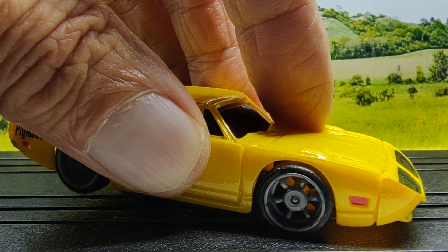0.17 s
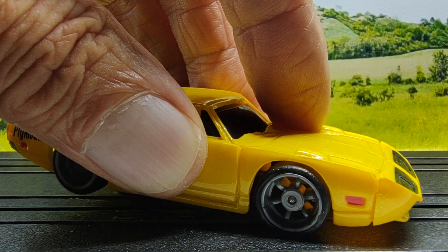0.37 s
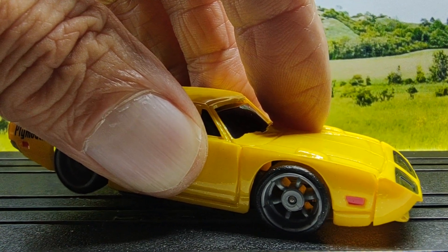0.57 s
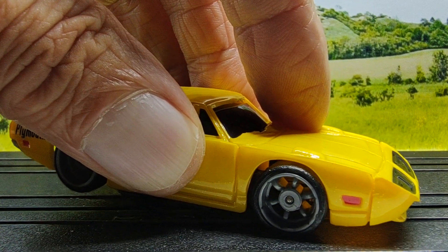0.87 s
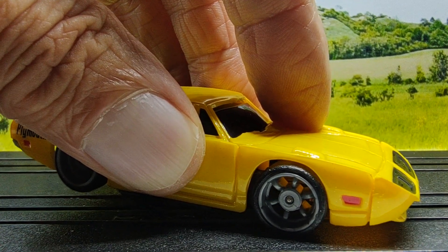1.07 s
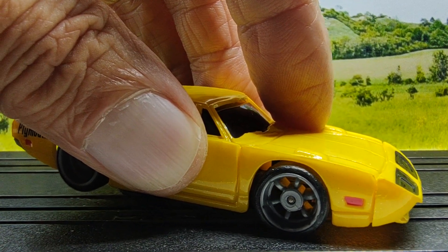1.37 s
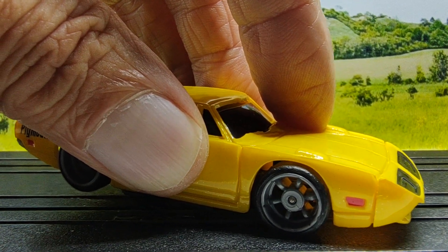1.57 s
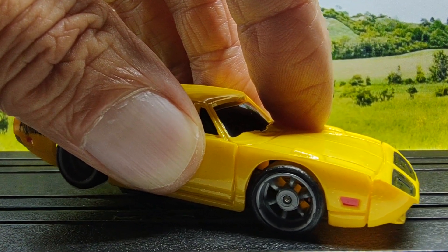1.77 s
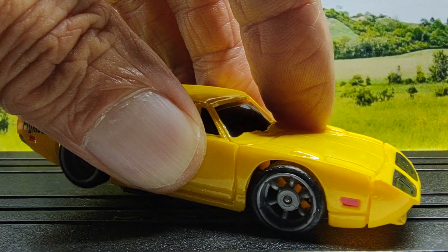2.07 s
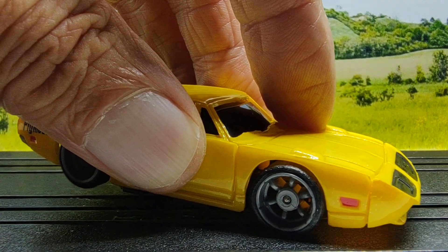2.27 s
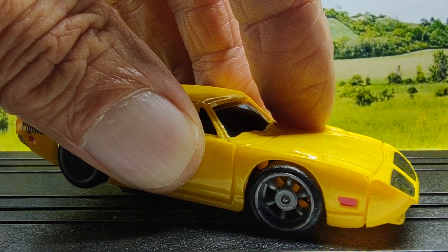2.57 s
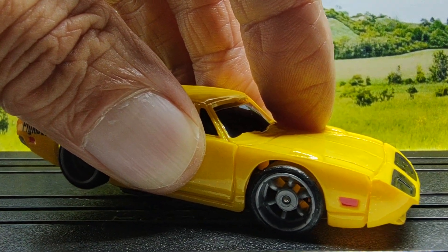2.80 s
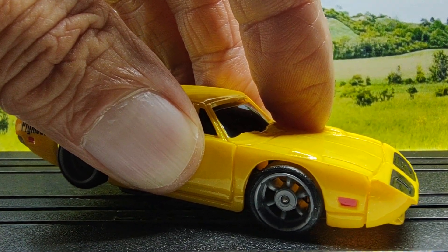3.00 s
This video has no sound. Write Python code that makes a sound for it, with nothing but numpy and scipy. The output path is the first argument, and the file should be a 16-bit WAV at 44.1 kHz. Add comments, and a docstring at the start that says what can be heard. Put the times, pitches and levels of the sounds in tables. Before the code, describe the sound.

A toy slot car's electric motor whirs continuously very close to a stereo microphone indoors: a piercing, many-toned whine with axle hum, rough beating and bright brush-and-gear hiss through a hollow plastic shell. Nearly steady at first, it bogs down from 0.4 s, reaches its lowest pitch around 0.65 s and recovers by 0.9 s. The whine then wavers slightly until about 3.1 s, still running.

```python
"""A toy slot car is held close to a stereo microphone indoors, its driven wheels spinning free.
The armature whines on multiples of its speed, the geared-down axle hums and beats against it, brushes and gears
hiss, all through the hollow shell. From 0.4 s the motor bogs down, is slowest near 0.65 s and recovers by 0.9 s;
the upper axle beat is strong early in the sag and again until 1.15 s. Then the whine wavers in pitch to the end."""
import sys
import numpy as np
from scipy import signal
from scipy.fft import rfft, irfft, next_fast_len
from scipy.io import wavfile
from scipy.ndimage import uniform_filter1d, map_coordinates

SR = 44100
rng = np.random.default_rng(int(sys.argv[2]) if len(sys.argv) > 2 else 0)


def generate_wav(signal):
    """Clip the signal to [-1, 1] and save it as 16-bit WAV at the path in sys.argv[1]."""
    frames = np.transpose(np.atleast_2d(signal))
    scaled = np.clip(frames, -1, 1) * 32767
    pcm = np.round(scaled).astype(np.int16)
    wavfile.write(sys.argv[1], SR, pcm)


N = 138474


def amp(db):
    """dB to gain."""
    return 10 ** (np.asarray(db) / 20)


def unit(x):
    """Scaled to rms 1."""
    return x / np.sqrt(np.mean(x ** 2) + 1e-20)


def along(rows, hz):
    """Each table column at hz, interpolated on a log frequency axis."""
    f, *cols = np.transpose(rows)
    return np.array([np.interp(np.log(hz + 1), np.log(f + 1), c) for c in cols])


def over_time(rows):
    """Each table column at every sample, interpolated linearly."""
    s, *cols = np.transpose(rows)
    return [np.interp(np.arange(N) / SR, s, c) for c in cols]


def wobble(rate_hz):
    """Smooth random curve through rate_hz normal random knots a second."""
    knots = rng.standard_normal(int(N * rate_hz / SR) + 4)
    return map_coordinates(knots, [np.arange(N) * rate_hz / SR])


def filtered(x, response):
    """x times a complex frequency response; the start is mirrored so that lagging parts begin full."""
    size, pad = next_fast_len(N + SR), SR // 10
    padded = np.concatenate([x[..., pad:0:-1], x], axis=-1)
    spectrum = rfft(padded, size) * response(np.fft.rfftfreq(size, 1 / SR))
    return irfft(spectrum, size)[..., pad:pad + N]


# phase by which left leads right: (frequency [Hz], lead [rad])
LEFT_LEAD = [(0, 0), (340, .4), (570, 3.6), (700, 6.3), (790, 9.3), (950, 12.6), (1640, 12.3), (2240, 16.4),
             (2370, 18.2), (3100, 24.3), (4220, 24.7), (4910, 31), (5340, 30.2), (6300, 34.3), (6800, 34.4),
             (7150, 36.9), (8530, 40.9), (8960, 44.5), (9730, 49.8), (10200, 51.4), (11100, 51.3),
             (11800, 53.2), (12600, 55.6), (14000, 63), (15800, 62.6)]


def path(rows):
    """Shell to both microphones: gain per side, the phase lead split evenly between them."""
    f, lead_rad = np.transpose(LEFT_LEAD)

    def response(hz):
        phase = np.exp(.5j * np.interp(hz, f, lead_rad) * [[1], [-1]])
        return amp(along(rows, hz)) * phase

    return response


PINION_TEETH, CROWN_TEETH = 7, 25
AXLE_RATIO = PINION_TEETH / CROWN_TEETH  # axle turns per armature turn

# relative hiss colour: (frequency [Hz], left density [dB per Hz], right density [dB per Hz])
HISS_PATH = [(30.2, -60, -66), (113, -39, -37), (160, -38, -41), (263, -31.5, -51.5), (320, -30.5, -24),
             (391, -28, -29), (407, -36, -28.5), (470, -37.5, -28.5), (555, -24, -42), (611, -34.5, -35),
             (672, -18, -18), (865, -22.5, -20.5), (925, -16, -20.5), (1022, -16, -22.5), (1094, -40, -27),
             (1106, -22.5, -24.5), (1270, -26, -19.5), (1395, -21, -26), (1395, -13, -30),
             (1447, -15.5, -34), (1525, -45, -27), (1576, -27, -18), (1643, -32, -29), (1763, -51, -23),
             (1920, -27.5, -26.5), (2120, -22, -25), (2320, -28.5, -23), (2420, -28.5, -16.5),
             (2670, -23, -21.5), (3090, -13.5, -13.5), (3370, -17.5, -27), (3560, -18.5, -15.5),
             (4200, -19.5, -19.5), (4950, -20, -19), (5460, -24.5, -25), (5370, -18.5, -10),
             (5940, -27, -34.5), (5984, -16, -16), (7570, -16.5, -8.5), (8246, -4, 0.5), (8920, -23, -5),
             (9060, -2.5, -7.5), (9900, -5.5, -7.5), (10250, -7.5, -19), (11300, -14.5, -15),
             (12300, -12, -15), (12400, -19.5, -17.5), (12740, -17.5, -22), (13000, -25, -25),
             (13650, -17, -19.5), (15000, -22.5, -25), (16300, -11.5, -13.5)]
# hiss power share common to both microphones: (frequency [Hz], share [0-1])
HISS_ALIKE = [(30, .9), (100, 0.95), (250, 0.6), (1000, 0.48), (2500, 0.45), (3100, 0.81), (3700, 0.01),
              (5500, 0.42), (6700, 0.71), (7400, 0.47), (9000, 0.8), (10400, 0), (11800, 0.46),
              (12500, 0.2), (15000, 0), (15700, 0.2)]
# hiss course before HISS_TRIM_DB: (time [s], level [dB])
HISS_LEVEL = [(0.0, -14), (0.02, -14), (0.55, -14), (0.71, -13), (0.85, -14), (2.7, -12.5), (3.14, -14.5)]
HISS_TRIM_DB = 2
PATCH_DB, SWELL_DB, RASP_DB = 0.97, 0.14, 0.5  # scatter: time-frequency patches, slow level, brush contact
TURN_DEPTH = 0.092  # fractional swell once an axle turn


def hiss(turns):
    """Brush and gear friction: patchy noise swelling once an axle turn, partly shared by both microphones."""
    spectra = signal.stft(rng.standard_normal((3, N)), nperseg=512)[2]
    # patches about 700 Hz by 60 ms
    patches = uniform_filter1d(rng.standard_normal(spectra.shape[1:]), 8, 0)
    patches = unit(uniform_filter1d(patches, 10, 1))
    noise = signal.istft(spectra * amp(PATCH_DB * patches), nperseg=512)[1][:, :N]
    axle_swell = 1 + TURN_DEPTH * np.sin(2 * np.pi * turns * AXLE_RATIO)
    noise = noise * axle_swell * amp(SWELL_DB * wobble(30.07) + RASP_DB * wobble(400))

    to_mics = path(HISS_PATH)
    share = lambda hz: np.clip(along(HISS_ALIKE, hz), 0, 1)
    common = filtered(noise[0], lambda hz: to_mics(hz) * np.sqrt(share(hz)))
    separate = filtered(noise[1:], lambda hz: to_mics(hz) * np.sqrt(1 - share(hz)))
    level_db, = over_time(HISS_LEVEL)
    return unit(common + separate) * amp(level_db + HISS_TRIM_DB)


# armature tones before the shell: (multiple of armature speed, level [dB])
WHINE = [(1, 0), (2, 1), (3, 1), (4, -1), (6, -2), (7, -2), (8, 1), (9, 0), (12, -8), (13, 1.2), (14, 3),
         (15, -6), (16, -12), (20, -1), (21, -3), (22, -4)]
# axle hum, lower beat, upper beat before the shell: (armature multiple, axle multiple, level [dB])
AXLE = [(0, 1, 0), (1, -1, 1), (1, 1, -1)]
# swell added to hum and upper beat: (time [s], hum [dB], upper beat [dB])
AXLE_LEVEL = [(0, 1, -4), (.38, 0, -5), (.43, 0, 2), (.8, -3, -8), (.86, -3, 1.5), (1.12, -3, 1.5),
              (1.16, -2, -5), (1.5, 1, -6), (3.14, 1, -4)]
# tone gain out of the shell: (frequency [Hz], left [dB], right [dB])
TONE_PATH = [(100, -65, -62), (190, -62, -58), (222, -49, -50), (450, -58, -55), (570, -46, -60),
             (620, -40, -39), (705, -30, -29.5), (745, -43, -39), (800, -52, -41), (960, -38, -43),
             (997, -37, -35), (1025, -52, -45), (1390, -41, -52), (1530, -52, -46), (1600, -44, -42),
             (2000, -52, -55), (2345, -39, -40), (2410, -42, -48), (2700, -52, -50), (3120, -37, -44),
             (3220, -43, -46), (4200, -50, -50), (4680, -41, -40), (5200, -50, -48), (5500, -45, -43),
             (6300, -39, -38), (7100, -45, -30), (9000, -33, -32), (9450, -17, -22), (10050, -19, -29),
             (10250, -22, -33), (10400, -33, -39), (10700, -23, -31), (10860, -23, -31), (10970, -33, -37),
             (11070, -22, -38), (11260, -19, -31), (11700, -21, -23), (12050, -22, -25), (12600, -29, -36),
             (13700, -29, -36), (14800, -35, -41), (15700, -38, -37)]
FLUTTER_DB, ROUGH_DB = 1.1, 1.6  # scatter: slow flutter of each tone; fast flutter at the 14th multiple
RING_LAG_S, RING_HZ = .006, 1600  # low tones linger in shell and room, less so above RING_HZ


def tones(turns):
    """Sines on armature multiples and axle beats; the higher the multiple, the rougher the level."""
    hum_db, upper_beat_db = over_time(AXLE_LEVEL)
    partials = list(WHINE)
    for (armature, axle, db), swell_db in zip(AXLE, [hum_db, 0, upper_beat_db]):
        partials.append((armature + axle * AXLE_RATIO, db + swell_db))

    x = np.zeros(N)
    for multiple, db in partials:
        level_db = db + FLUTTER_DB * wobble(12) + ROUGH_DB * multiple / 14 * wobble(300)
        sine = np.sin(2 * np.pi * (multiple * turns + rng.random()))
        x += amp(level_db) * np.sqrt(2) * sine

    to_mics = path(TONE_PATH)
    lag = lambda hz: np.exp(-2j * np.pi * RING_LAG_S * RING_HZ * np.tanh(hz / RING_HZ))
    return filtered(x, lambda hz: to_mics(hz) * lag(hz))


# armature speed: (time [s], speed [turns per s])
SPEED = [(0.009, 804.3), (0.118, 804.0), (0.206, 796.3), (0.253, 799.2), (0.345, 782.7), (0.405, 785.4),
         (0.438, 767.7), (0.523, 696.2), (0.562, 667.7), (0.618, 633), (0.655, 627), (0.683, 632),
         (0.7, 676), (0.728, 727), (0.755, 752), (0.782, 768), (0.894, 788.5), (1.126, 776.3),
         (1.161, 783.0), (1.228, 776.9), (1.263, 783.3), (1.311, 783), (1.366, 772.0), (1.44, 784.1),
         (1.518, 782.8), (1.583, 772.8), (1.65, 778.8), (1.685, 788.0), (1.777, 782.7), (1.855, 793.2),
         (1.947, 788.0), (2.002, 793.9), (2.084, 788.0), (2.204, 785.1), (2.226, 792.8), (2.286, 795.1),
         (2.321, 804.4), (2.518, 796.7), (2.555, 787.6), (2.603, 785.5), (2.635, 791.9), (2.695, 788.0),
         (2.73, 793.9), (2.8, 787.8), (2.88, 799.9), (2.927, 787.2), (3.044, 797.4), (3.129, 792.0)]
JITTER_HZ = 0.9  # scatter of speed at full speed
BOG_JITTER = .015  # extra scatter [Hz] per Hz of lost speed


def armature_turns():
    """Turns since the start: speed plus jitter, integrated; a bogged-down motor runs less evenly."""
    speed_hz, = over_time(SPEED)
    jitter_hz = JITTER_HZ + BOG_JITTER * (speed_hz.max() - speed_hz)
    return np.cumsum(speed_hz + jitter_hz * wobble(70)) / SR


def scene():
    """One armature drives both the tones and the hiss."""
    turns = armature_turns()
    return tones(turns) + hiss(turns)


TOP_HZ = 15740


def record(dry):
    """The recorder clips the highest peaks and cuts steeply above its band limit."""
    return filtered(np.clip(dry, -1, 1), lambda hz: 1 / (1 + (hz / TOP_HZ) ** 1500))


dry = scene()
out = record(dry)
generate_wav(out)
```